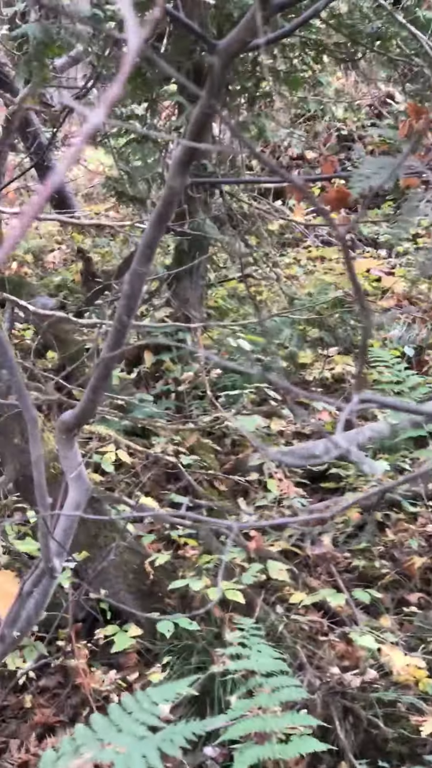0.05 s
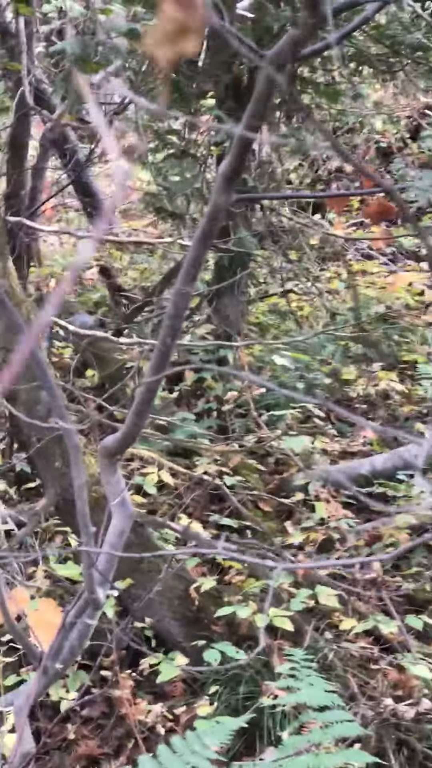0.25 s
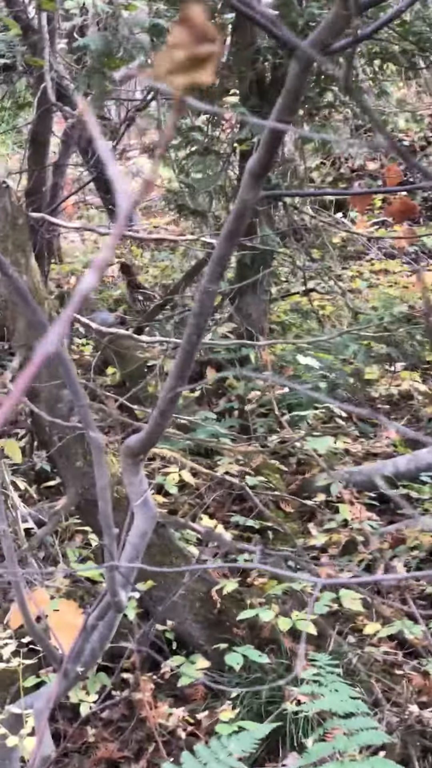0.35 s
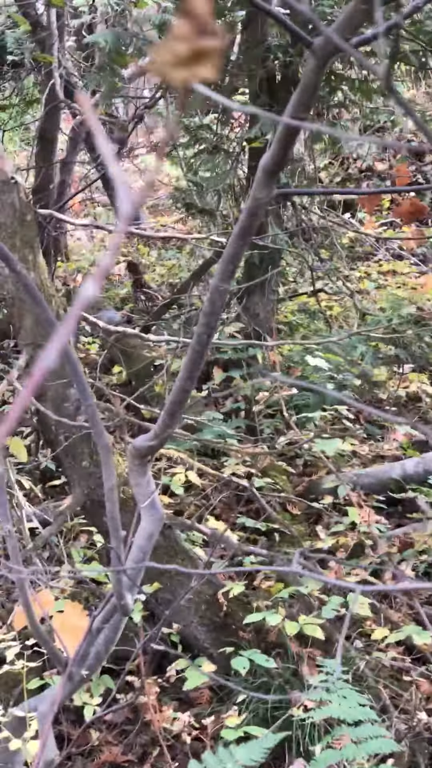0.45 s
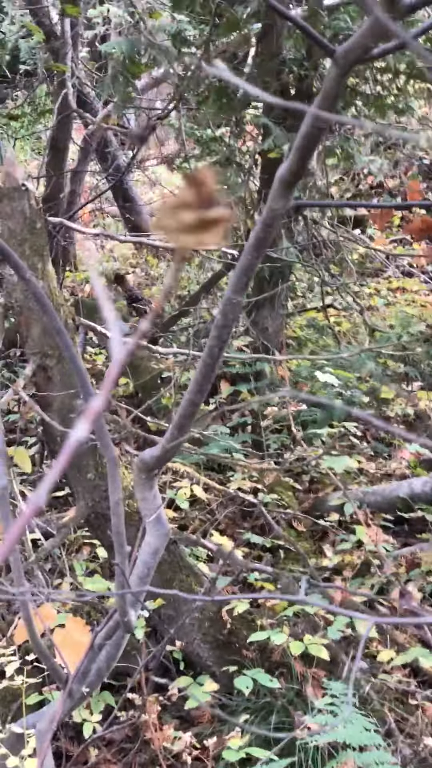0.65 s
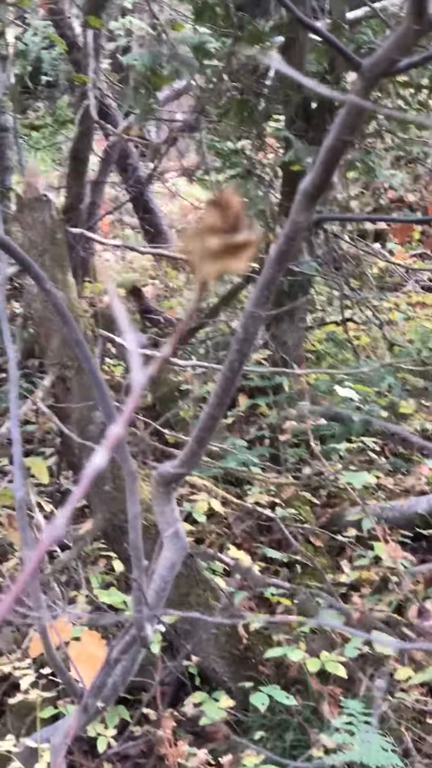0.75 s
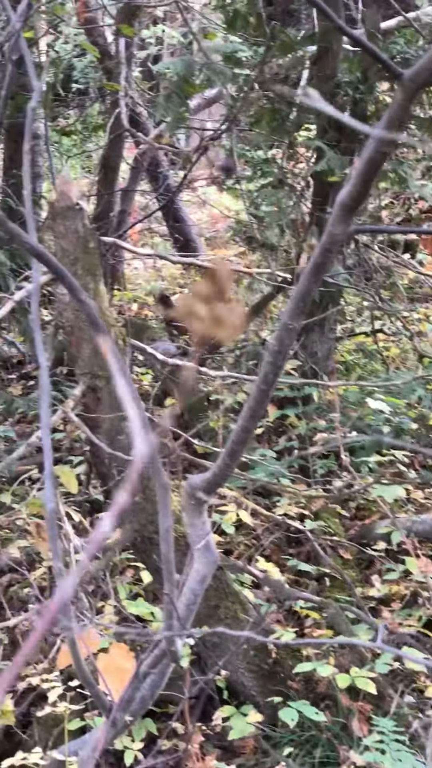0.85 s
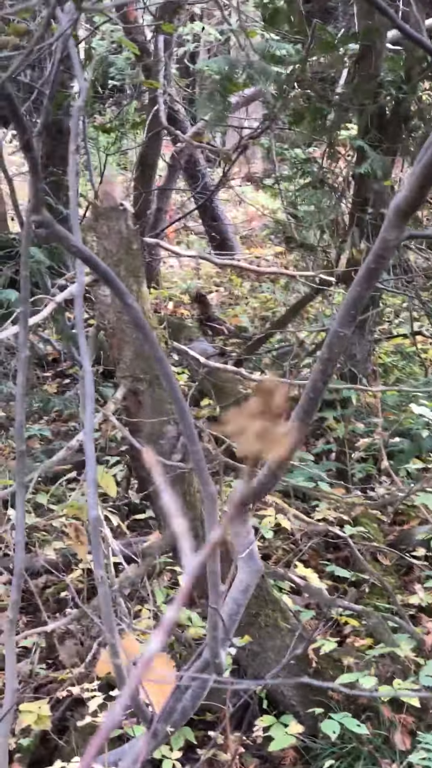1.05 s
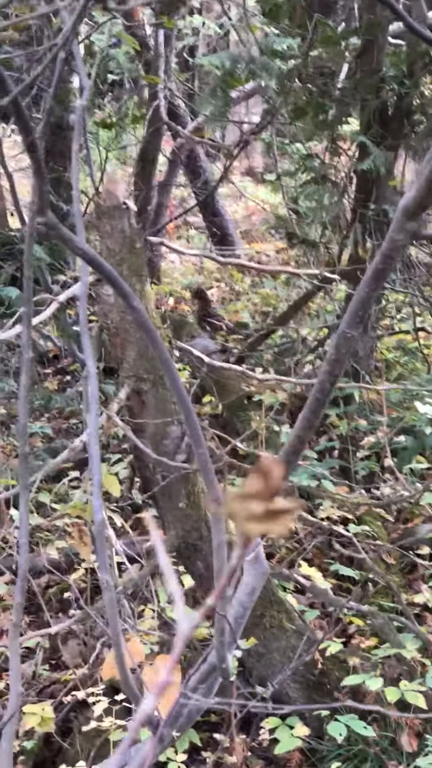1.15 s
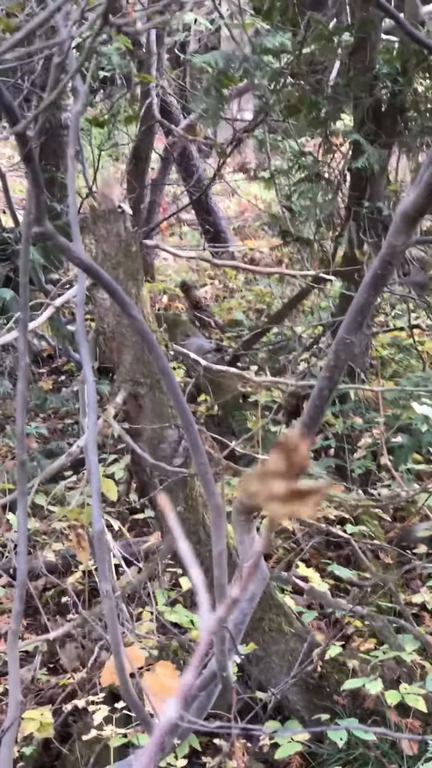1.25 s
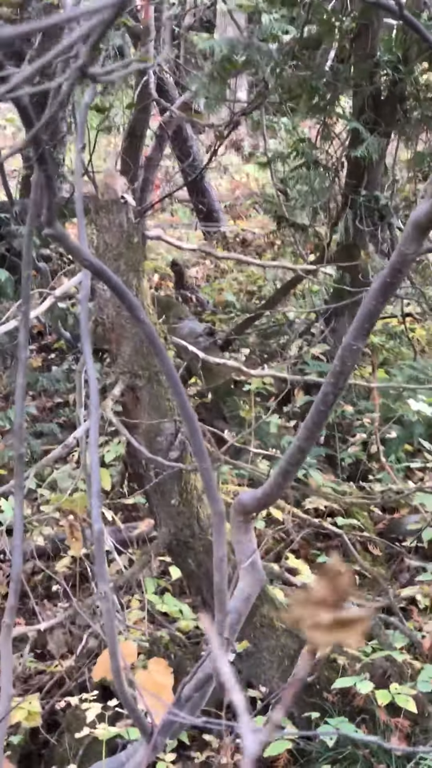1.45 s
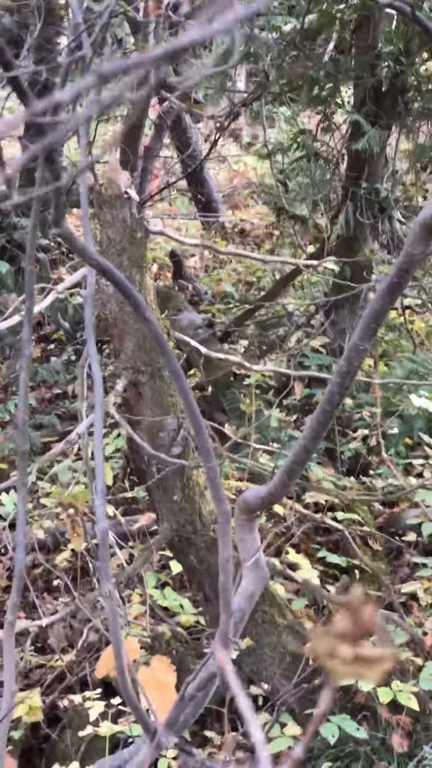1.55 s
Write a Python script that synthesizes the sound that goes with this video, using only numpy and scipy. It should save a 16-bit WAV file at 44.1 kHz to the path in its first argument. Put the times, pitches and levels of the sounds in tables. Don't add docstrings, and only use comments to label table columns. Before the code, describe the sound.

Twigs snap underfoot, close and dry. A thin twig cracks at 0.09 s, leaves drag, then a dense, loud volley breaks at 0.21-0.29 s with low thumps. Tiny squeaks precede smaller snaps near 0.46 and 0.62 s, with more at 0.7 s. Then sparse leaf ticks, rustles and soft swishing, with weak snaps at 1.28 s. Faint rising bird chirps at 0.15, 0.83, 1.07 and 1.54 s over quiet woodland hush.

```python
import sys
import numpy as np
from scipy import signal
from scipy.io import wavfile

SR = 44100
rng = np.random.default_rng(int(sys.argv[2]) if len(sys.argv) > 2 else 0)


def elevation(decibels):
    levels = np.asarray(decibels, float)
    return 10 ** (levels / 20)


def dump(signal):
    limited = np.clip(np.atleast_2d(signal).T, -1, 1)
    pcm = np.round(limited * 32767).astype(np.int16)
    wavfile.write(sys.argv[1], SR, pcm)


N = 70560

BREAK_LAG_S = 0.00095
SOFT_CUTOFF_HZ = 15850


def curve(rows, x, log=False):
    a, b = np.transpose(rows)
    if log:
        return np.interp(np.log(x), np.log(a), b)
    return np.interp(x, a, b)


def peak_one(x):
    return x / (np.abs(x).max() + 1e-12)


def rms_one(x):
    return x / np.sqrt(np.mean(x ** 2) + 1e-20)


def add(out, s, x):
    i = max(int(s * SR), 0)
    out[i:i + len(x)] += x[:len(out) - i]


def band(x, low_hz, high_hz, order=2):
    limits = [low_hz, min(high_hz, .45 * SR)]
    return signal.sosfilt(signal.butter(order, limits, "band", fs=SR, output="sos"), x)


def around(x, hz, octaves, order=2):
    return band(x, hz * 2 ** -octaves, hz * 2 ** octaves, order)


def cut_top(x, hz):
    return signal.sosfilt(signal.cheby2(18, 60, hz * 1.02, fs=SR, output="sos"), x)


def drift(rate):
    r = np.exp(-2 * np.pi * rate / SR)
    wander = signal.lfilter([1], [1, -2 * r, r * r], rng.standard_normal(2 * N))
    return rms_one(wander[N:])


def crack(noise, hz, decay_s, octaves, wide_db):
    n = np.arange(len(noise))
    burst = (noise + 3.8 * (n == 0)) * np.exp(-n / SR / decay_s)
    body = around(burst, hz, octaves)
    edge = band(burst, hz * 0.7, min(hz * 2.1, 15000), order=1)
    return peak_one(peak_one(body) + elevation(wide_db) * peak_one(edge))


def rough(noise):
    return 1 + .55 * rms_one(band(noise[::-1], 150, 1500, order=1))


# t/s, peak level/dB, crack f/Hz, bending
# wave level/dB (from the peak)
SNAPS = [(0.088, -21, 3800, -25), (0.0913, -28.5, 3770, -25), (0.2097, -25, 2470, -23),
         (0.2279, -11, 6000, -17), (0.2335, -9.5, 7260, -20.5), (0.2385, -8, 8200, -15.5),
         (0.2460, -5.5, 6300, -24.5), (0.2578, -36, 3600, -30), (0.2893, -16.5, 4260, -16),
         (0.2903, -23, 9050, -30), (0.4584, -24, 6100, -8), (0.6364, -28.5, 5800, -8),
         (0.7027, -33, 9000, -1), (0.7158, -23.5, 3250, -12.5), (0.7223, -34.5, 3180, -35),
         (0.732, -41, 3320, -26), (1.2779, -24, 3400, -16.5), (1.278, -29, 7400, -27),
         (1.304, -30, 3600, -24),
         (0.211, -24.5, 3540, -16), (0.2409, -13.5, 5500, -20.5), (0.2495, -7, 5750, -18),
             (.615, -12, 3020, -10), (.6153, -20, 6400, -38), (0.6186, -21.5, 4600, -10),
             (0.7193, -29.5, 5900, -27), (0.2990, -36, 4500, -20), (0.7084, -38, 6040, -33),
             (0.2329, -14, 8400, -17), (0.2404, -7, 6430, -20.5), (0.2426, -14, 8000, -36),
             (0.2457, -6, 9900, -34), (0.2518, -22, 5800, -19), (0.4576, -20.5, 6500, -23)]


def twigs():
    bend_hz_at_1ms, bend_law, bend_decay_s = 1956, 1.105, 0.0033
    out = np.zeros(N)
    t = np.arange(1, 900) / SR
    sweep_hz = np.minimum(bend_hz_at_1ms * (t / 0.001002) ** -bend_law, 3000)
    swell = peak_one((1 - np.exp(-t / 0.00042)) * np.exp(-t / bend_decay_s))
    bend = np.sin(2 * np.pi * np.cumsum(sweep_hz) / SR) * swell
    for s, db, hz, bend_db in SNAPS:
        noise = rng.standard_normal(len(t))
        snap = crack(noise, hz, decay_s=0.00033, octaves=0.45, wide_db=-4)
        snap = snap + elevation(bend_db) * bend * rough(noise)
        add(out, s + BREAK_LAG_S, elevation(db) * snap)
    return out


# start t/s, length t/s, level/dB, slip rate f/Hz, level/dB per overtone
SQUEAKS = [
    (0.448, 0.0105, -50, 1790, -0.5),
    (0.606, 0.0097, -36, 3060, -30),
]


def squeaks():
    wobble, flicker_db = .012, 4
    out = np.zeros(N)
    for s, length, db, hz, tilt_db in SQUEAKS:
        u = np.linspace(0, 1, int(length * SR))
        rate_hz = hz * (1 - .1 * np.exp(-6 * u) + wobble * drift(300)[:len(u)])
        turns = np.cumsum(rate_hz) / SR
        tone = u ** 2 * elevation(.3 * tilt_db + 9) * np.sin(2 * np.pi * turns) * (tilt_db < -10)
        for k in range(2, int(13500 / hz) + 1):
            level = elevation(tilt_db * k + flicker_db * drift(250)[:len(u)])
            tone += level * np.sin(2 * np.pi * (k * turns + rng.random()))
        fade = np.clip(np.minimum(u, 1 - u) * 15, 0, 1)
        add(out, s, elevation(db) * tone * fade)
    return out


# t/s, peak level/dB, f/Hz
TICKS = [(0.1435, -44, 6500), (0.1452, -44, 1500), (0.1885, -43, 6000), (0.2694, -37, 3710),
         (0.2834, -32, 4800), (0.2957, -38, 2600), (0.3055, -41, 5000), (0.3105, -41, 5800),
         (0.3155, -41, 1600), (0.4625, -39, 3500), (0.4704, -38, 2500), (0.5581, -46, 2630),
         (0.6265, -33, 5800), (0.6298, -34, 5000), (0.6328, -35, 5600), (0.6404, -39, 5800),
         (0.6458, -39, 6200), (0.8086, -44, 6130), (0.8538, -44, 2500), (1.1925, -43, 2000),
         (1.288, -47, 4000), (1.3155, -46, 4800), (1.4514, -47, 3800), (1.5015, -48, 1400),
         (1.5464, -47, 5140),
         (0.4738, -40, 14200), (0.271, -36, 13500), (0.4984, -40, 14900), (0.5487, -45, 12200),
              (0.5688, -42.5, 7440), (0.6215, -42, 12000), (0.7257, -25.5, 14700), (0.8528, -37, 12300),
              (0.8663, -39, 9500), (0.849, -49, 11000), (0.897, -42, 12000), (0.8745, -40, 9000),
              (0.9096, -38, 7490), (0.9574, -51, 10800), (0.9777, -33, 10300), (0.9834, -39, 12000),
              (1.132, -35, 7300), (1.1414, -37, 10900), (1.1524, -34.5, 14300), (1.1917, -41.5, 9600),
              (1.3174, -39, 11000), (1.319, -40, 5000), (1.3568, -42, 8300)]


def leaf_ticks():
    out = np.zeros(N)
    for s, db, hz in TICKS:
        tick = crack(rng.standard_normal(500), hz, decay_s=.0009, octaves=.38, wide_db=-11)
        add(out, s + BREAK_LAG_S, elevation(db) * tick)
    return out


# start t/s, length t/s, level/dB, centre f/Hz
RUSTLES = [(0.128, 0.081, -58, 5750), (0.207, 0.01, -53.5, 6100), (0.228, 0.0078, -38, 6400),
           (0.251, 0.0034, -29.5, 7640), (0.253, 0.047, -49, 4500), (0.283, 0.0026, -42.5, 5000),
           (0.291, 0.029, -51, 5730), (0.357, 0.015, -56, 7500), (0.383, 0.0095, -55.5, 6960),
           (0.447, 0.009, -49, 9000), (0.44, 0.008, -56, 6000), (0.454, .02, -50, 6700),
           (0.472, 0.0054, -48, 14000), (0.617, 0.018, -49, 5760), (0.626, 0.0032, -52, 11000),
           (0.701, 0.0035, -54, 6030), (0.7178, 0.004, -45, 8900), (0.726, 0.0077, -50.5, 11100),
           (0.85, 0.006, -55.5, 13200), (0.866, 0.012, -53.5, 11100), (0.883, 0.02, -56.5, 11000),
           (0.868, 0.039, -59, 4460), (.912, 0.019, -62, 12000), (0.927, 0.066, -61, 10700),
           (1.025, 0.033, -64.5, 12000), (1.08, 0.033, -62, 11000), (1.124, 0.013, -55.5, 7800),
           (1.138, 0.019, -55, 11400), (1.16, 0.013, -64, 11000), (1.191, 0.0053, -57.5, 11200),
           (1.307, 0.1, -86, 3800), (1.544, 0.026, -59, 4830), (0.549, 0.016, -66, 6000),
           (0.2393, 0.003, -24.5, 7500), (0.2685, 0.0045, -42, 13300), (0.773, 0.045, -64, 14290)]


def rustles():
    count, grains_per_s, grain_spread_db, flicker_db = 7, 6000, 3.5, 5.0
    spacing_octaves, leaf_octaves, edge_s = .55, .13, .0012
    out = np.zeros(N)
    flicker = [flicker_db * 1.4 * np.tanh(drift(86)) for k in range(count)]
    grain_db = grain_spread_db * np.minimum(rng.exponential(1, (count, N)), 3)
    sizes = elevation(grain_db + flicker) * rng.choice([-1, 1], (count, N))
    grains = sizes * (rng.random((count, N)) < grains_per_s / SR)
    for s, length, db, hz in RUSTLES:
        t = np.arange(int((length + 2 * edge_s) * SR)) / SR
        fade = np.clip(np.minimum(t, t[-1] - t) / edge_s, 0, 1)
        piece = grains[:, int(s * SR):][:, :len(t)] * fade
        burst = 0
        for away, leaf in zip(np.linspace(-2, 1, count), piece):
            leaf_hz = min(hz * 2 ** (away * spacing_octaves), 15000)
            colour = rms_one(around(leaf, leaf_hz, leaf_octaves, order=1))
            burst = burst + elevation(-6.0 * away ** 2) * colour
        add(out, s - edge_s, elevation(db) * rms_one(burst))
    return cut_top(out, SOFT_CUTOFF_HZ)


# start t/s, length t/s, level/dB, f/Hz
SCRAPES = [
    (0.356, 0.019, -50.5, 4160),
    (0.34, 0.011, -50.5, 4100),
    (0.37, 0.008, -49, 3500),
    (0.251, 0.005, -34, 5800),
    (0.451, 0.007, -49, 5290),
]


def scrapes():
    out = np.zeros(N)
    for s, length, db, hz in SCRAPES:
        u = np.linspace(0, 1, int(length * SR))
        grains = rng.standard_normal(SR // 20)[:len(u)] ** 3
        ring = rms_one(around(grains, hz, .16))
        add(out, s, elevation(db) * np.sin(np.pi * u) ** .5 * ring)
    return out


# t/s, peak level/dB, f/Hz, time to fall 60 dB t/s
THUMPS = [(0.21, -38.5, 426, 0.061), (0.233, -32, 122, 0.064), (.25, -22, 305, 0.025),
          (0.25, -29, 104.5, 0.16), (0.286, -34, 54.5, 0.087), (.32, -41, 82, 0.22),
          (.471, -37.5, 513, 0.042), (0.49, -44, 164, 0.052), (0.089, -41.5, 560, 0.021),
          (0.62, -33.5, 1120, 0.032), (0.5, -55, 65, 0.11), (0.739, -52, 140, 0.092),
          (1.13, -47.5, 880, 0.049), (.62, -34, 377, 0.033), (0.63, -30.5, 262, 0.038),
          (0.64, -32.5, 93, 0.079), (.72, -43, 460, 0.024), (.81, -51.5, 330, 0.064),
          (.855, -46, 142, 0.042), (1.18, -48, 250, 0.04), (1.135, -49.5, 103, 0.26),
          (1.196, -45, 185, 0.038), (1.251, -45.5, 173, 0.12), (1.283, -43.5, 171, 0.13),
          (1.336, -47.5, 307, 0.065), (1.385, -44, 318, 0.036), (1.56, -44, 425, 0.022),
          (1.499, -51, 114, 0.51), (.459, -41, 900.6, 0.019), (.638, -35.5, 1380, 0.017),
          (.615, -41.5, 148, .08), (.27, -36.5, 490, 0.019), (.283, -36.5, 194.6, 0.088)]


def thumps():
    attack_s, roughness = 0.0014, 0.56
    out = np.zeros(N)
    t = np.arange(SR // 3) / SR
    for s, db, hz, t60 in THUMPS:
        noise = rng.standard_normal(len(t))
        shape = peak_one((1 - np.exp(-t / attack_s)) * elevation(-60 * t / max(t60, .01)))
        tone = np.sin(2 * np.pi * hz * t) + roughness * rms_one(band(noise, hz * 0.44, hz * 2.15))
        add(out, s, elevation(db) * shape * tone)
    return out


def wood(x):
    echo_t60_s = 0.19
    t = np.arange(SR // 4) / SR
    scatter = band(rng.standard_normal(len(t)), 250, 3800, order=1)
    tail = scatter * elevation(-60 * t / echo_t60_s) * (t > .004)
    return signal.fftconvolve(x, tail / np.sqrt(np.sum(tail ** 2)))[:N]


# start t/s, level/dB
CHIRPS = [
    (.152, -66),
    (.827, -60.5),
    (1.069, -60),
    (1.535, -60),
]


def bird():
    length_s, from_hz, to_hz = .034, 4150, 5550
    out = np.zeros(N)
    u = np.linspace(0, 1, int(length_s * SR))
    hz = from_hz + (to_hz - from_hz) * u ** .9
    chirp = np.sin(np.pi * u ** 1.6) ** .8 * np.sin(2 * np.pi * np.cumsum(hz) / SR)
    for s, db in CHIRPS:
        add(out, s, elevation(db + 3) * chirp)
    return out * elevation(4 * np.tanh(drift(150))) + .45 * wood(out)


def banded_noise(spectrum, patchy_db, rate):
    out = 0
    together = 2.24 * np.tanh(drift(rate))
    edges = 30 * 2 ** np.arange(0, 9.6, .5)
    white = rng.standard_normal((2, N))
    for k, (low, high) in enumerate(zip(edges, edges[1:])):
        flicker_db = patchy_db * (together + np.tanh(drift(rate)))
        db = curve(spectrum, np.sqrt(low * high), log=True) + flicker_db
        out = out + elevation(db) * band(white[k % 2], low, high)
    return rms_one(out)


# t/s, level/dB
MOTION = [(0, -56), (.1, -52), (.3, -56), (.4, -53), (.5, -53), (.7, -56.5), (.8, -57.5), (.92, -59),
          (1.1, -59.5), (1.135, -52.5), (1.23, -55.5), (1.4, -50.5), (1.52, -57), (1.6, -53)]
# f/Hz, level/dB (per Hz)
SWISH = [(35, -43), (60, -6.5), (147, -3), (386, -8), (4630, -20), (10000, -31.5), (13000, -73),
         (22000, -120)]


def swish():
    motion_db = curve(MOTION, np.arange(N) / SR)
    return elevation(motion_db) * banded_noise(SWISH, patchy_db=1.0, rate=31)


# f/Hz, level/dB (per Hz)
HUSH = [(18, -40), (30, 6), (98, 7.5), (210, -17), (384, -30), (461, -13), (1350, -9.5), (4910, -12),
        (16000, -9.5)]


def hush():
    return elevation(-63) * banded_noise(HUSH, patchy_db=1.1, rate=10.4)


def scene():
    near = twigs() + squeaks() + leaf_ticks() + rustles() + scrapes()
    echo = elevation(-26) * wood(near)
    background = cut_top(swish() + hush(), SOFT_CUTOFF_HZ)
    return (near + echo + thumps() + bird() + background)[None]


def roll_off(x):
    return signal.sosfilt(signal.butter(12, 16840, fs=SR, output="sos"), x)


def record(dry):
    topped = cut_top(dry, 16450)
    mix = signal.sosfilt(signal.butter(2, 45, "high", fs=SR, output="sos"), topped)
    return roll_off(mix)


dry = scene()
out = record(dry)
dump(out)
```